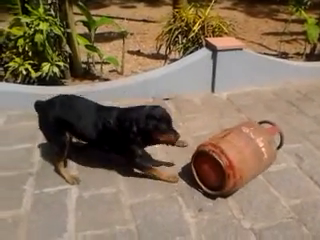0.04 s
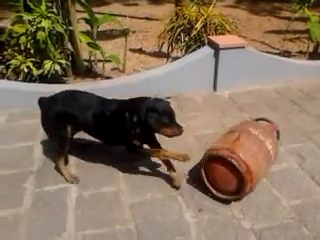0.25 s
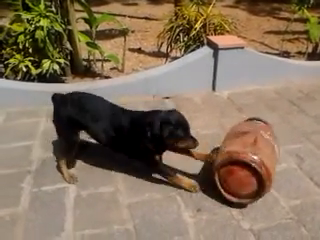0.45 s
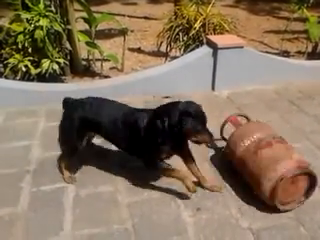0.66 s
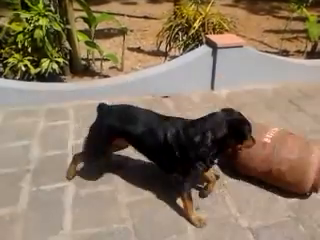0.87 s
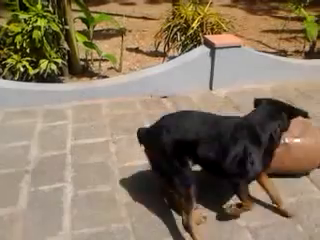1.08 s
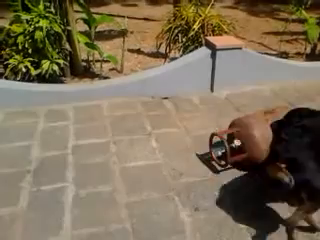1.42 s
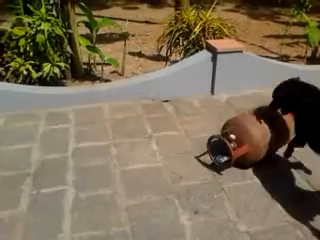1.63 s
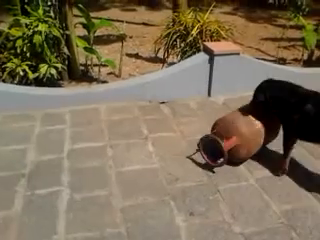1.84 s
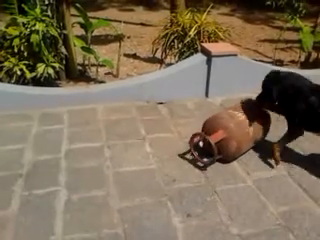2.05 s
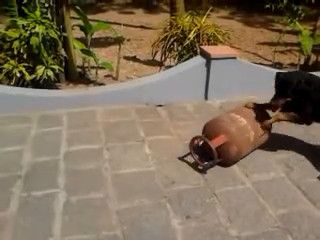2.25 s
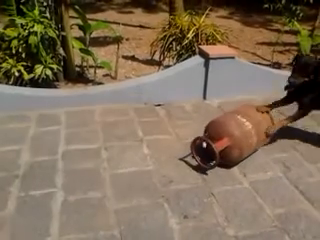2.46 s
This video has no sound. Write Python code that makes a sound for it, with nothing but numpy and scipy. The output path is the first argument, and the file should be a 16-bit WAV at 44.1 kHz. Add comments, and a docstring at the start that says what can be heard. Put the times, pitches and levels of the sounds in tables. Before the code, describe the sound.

A hollow metal gas cylinder is shoved across a paved yard. Two quick dog barks come first, with a metallic ring between them, then the cylinder clangs loudly, squeaks and grinds along, close to a dull-sounding microphone.

```python
"""Dog and rolling gas cylinder

A dog barks twice and shoves an empty steel gas cylinder over the stone paving of a walled yard.
The barks are rough glottal harmonics shaped by mouth and throat. The foot ring chimes; the shell
clanks in its modes, skids, squeaks, grinds on grit and bumps over the joints as it rolls.
A narrow-band microphone close by overloads on the loudest clank."""
import sys
import numpy as np
from scipy import signal
from scipy.fft import rfft, irfft
from scipy.io import wavfile
from scipy.ndimage import minimum_filter1d

SR = 44100
rng = np.random.default_rng(int(sys.argv[2]) if len(sys.argv) > 2 else 0)


def materialize(psi):
    """Save the field psi as 16-bit PCM at rate SR to the path in sys.argv[1].

    A 1-D psi becomes a single channel; in a 2-D psi each row is a channel.
    """
    bounded = np.clip(np.atleast_2d(psi).T, -1, 1)
    quanta = np.round(bounded * 32767).astype(np.int16)
    wavfile.write(sys.argv[1], SR, quanta)


N = 110250

# bark contours: (time [s], pitch [Hz], level [dB], mouth resonance [Hz])
BARK_1 = [(.178, 188, -48.5, 544), (.198, 235.7, -11.5, 700), (.218, 261.7, -9.5, 720),
          (.238, 305.5, -9.5, 650), (.251, 401, -12.5, 776), (.265, 527.6, -5.5, 1000),
          (.272, 536.5, -12, 1050), (.289, 510.8, -5.5, 975), (.297, 303.6, -21, 650),
          (.316, 285.4, -12, 582), (.345, 227, -31.5, 540)]
BARK_2 = [(.553, 154.5, -36, 379), (.58, 236.3, -21, 718), (.6, 320.1, -9, 878), (.617, 358, -7, 978),
          (.635, 268.7, -5.5, 645), (.655, 262.6, -6, 550), (.685, 211.8, -16, 660), (.71, 208.1, -16, 628),
          (.745, 175, -40.5, 570)]
# throat resonances: (centre [Hz], width [Hz], level [dB])
THROAT_1 = [(1040, 170, 0), (1870, 200, -7), (2170, 140, -12), (3380, 300, -25)]
THROAT_2 = [(1040, 220, -3), (1755, 140, 3), (2300, 200, -18), (3480, 300, -25)]
# steel modes: (frequency [Hz], level [dB], t60 [s])
SHELL_MODES = [(802.3, -2, 0.88), (821.4, -5.5, .45), (1118.5, 2, 0.31), (1440, -12.5, 0.34),
               (1640, -4.5, 0.3), (1772, -7.5, .4), (1825, 0, 0.22), (2138, -9.5, 0.76), (2253, 2.5, 0.25),
               (2440, -19.5, 0.32), (2758, -11.5, 0.49), (3033, -1, .32), (3150, -3.5, 0.26),
               (3197, -7, 0.43)]
FOOT_RING_MODES = [(1005, -14.5, 0.34), (2020, -8.5, 0.97), (2090, -0.5, 0.39), (2366, -4, 0.073),
                   (3306, 2.5, 0.067), (3314, -14, 0.5)]
# shell strikes: (time [s], boom [dB], ring [dB], clang [dB], ting [dB], clatter [dB])
SHELL_STRIKES = [(.003, -47, -32, -54.5, -46.5, -53.5), (.758, -49, -44.5, -34.5, -23.5, -51.5),
                 (.821, -25.5, -30.5, -40.5, -35.5, -48.5), (0.845, -21.5, -17.5, -33.5, -26, -28),
                 (.9, -7.5, -10, 0.5, -18, -3), (.925, -12, -7.5, -14.5, -31, -29.5),
                 (.945, -5, -11.5, -24.5, -30.5, -27), (1.068, -20, -21.5, -24.5, -43, -29.5),
                 (1.1745, -32, -24, -11.5, -12.5, -13.5), (1.274, -17.5, -24.5, -24, -39.5, -23.5),
                 (1.303, -11, -25.5, -33, -59.5, -31.5), (1.519, -24.5, -39.5, -38, -45, -35),
                 (1.575, -32.5, -32.5, -31.5, -51, -38.5), (1.598, -41.5, -45, -29, -38, -41),
                 (1.745, -25, -15, -37, -26, -24.5), (1.826, -41.5, -27, -43.5, -37.5, -30),
                 (2.124, -62.5, -30.5, -27, -22.5, -26.5), (2.345, -47, -38, -51, -33.5, -54)]
# shell registers: (boom [Hz], ring low [Hz], ring high [Hz], clang [Hz], ting [Hz])
REGISTERS_HZ = [800, 1120, 1830, 2250, 3100]
# foot ring knocks: (time [s], level [dB], tilt [dB/octave], clatter [dB])
FOOT_RING_KNOCKS = [(.335, -21, 12.5, -23.5), (.359, -16, 7, -26.5)]
# rim on stone: (time [s], rise [s], t60 [s], level [dB])
RIM_SKIDS = [(0.719, 0.033, 0.5, -18.5), (1.823, 0.034, 0.5, -18), (2.119, 0.0055, 0.15, -17)]
# sliding steel: (time [s], length [s], pitch [Hz], level [dB])
STEEL_SQUEAKS = [(0.972, 0.025, 1588, -15.5), (1.035, 0.087, 2074, -33.5), (1.245, 0.063, 2633, -20.5),
                 (1.585, 0.049, 2194, -26.5), (1.61, 0.018, 2960, -22.5), (1.85, 0.046, 3440, -20.5)]
# bumps over joints: (time [s], level [dB], pitch [Hz])
JOINT_BUMPS = [(.766, -10, 294), (.783, -24.5, 230), (.852, -18.5, 247.3), (0.902, -12.5, 200),
               (1.054, -23, 260), (1.12, -39, 240), (1.268, -21, 202), (1.539, -29.5, 187.5),
               (1.658, -27.5, 185), (1.741, -25.5, 200), (1.824, -31, 200), (2.324, -30.5, 260)]
# rolling contour: (time [s], grinding [dB], rumble [dB])
ROLL_LEVELS = [(0, -31, -45.5), (.16, -43.5, -53), (.22, -16, -31), (.38, -37, -48), (.53, -40, -49.5),
               (.7, -28.5, -29), (.87, -17.5, -37.5), (1.12, -20.5, -41.5), (1.4, -23, -40.5),
               (1.5, -27, -40), (1.58, -26, -30.5), (1.68, -32.5, -45), (1.87, -26.5, -53),
               (2.05, -31, -46), (2.2, -31.5, -52), (2.3, -34.5, -69), (2.42, -33.5, -60), (2.5, -41, -63)]
# noise spectra: (frequency [Hz], level [dB])
CLATTER_SPECTRUM = [(150, -19.5), (500, -0.5), (850, 9.5), (1300, 9), (1750, 6), (2300, 14), (3200, 10),
                    (3700, 7.5), (4500, -30.5)]
SKID_SPECTRUM = [(400, -44.5), (1500, -23), (2400, -0.5), (2900, 3.5), (3300, 12.5), (3600, 5),
                 (4500, -20.5)]
THUD_SPECTRUM = [(30, -23), (80, -4.5), (150, -1.5), (300, 2), (450, -4.5), (900, -16), (2000, -42)]
GRIT_SPECTRUM = [(200, -25), (500, -4), (850, 6.5), (1350, 3), (1800, 4.5), (2600, -3.5), (3200, -0.5),
                 (3700, -11), (4500, -17)]
RUMBLE_SPECTRUM = [(20, -23.5), (60, -9.5), (110, -0.5), (200, 0.5), (400, -1.5), (800, -6), (2000, -45)]

MOUTH_WIDTH_HZ, MOUTH_DB, CHEST_DB, VALLEY_DB = 200, 1.5, -26, -27
JITTER, SHIMMER_DB, RASP, RASP_KNEE_HZ = .024, 1.6, .33, 280
TWIN_MIN_SPLIT_HZ, TWIN_DB, WOBBLE_PER_S, WOBBLE_DB = 9, -9, 55, 3.2
STRIKE_RISE_S, CHIME_RISE_S, CRACK_DB = .004, .0048, 1
SQUEAK_WAVER, THUD_SAG_PER_S = .006, 6
GRIT_PER_S, GRIT_SPREAD_DB, GRIT_HISS, GRIT_DB = 600, 4.2, .09, -3.5
SING_DB, SING_DB_PER_OCTAVE = -8, -3.5
WALL_DELAY_S, YARD_DB = .02, -11.5
ROLLOFF_HZ, BAND_HZ, TOP_HZ = 3600, 4250, 16000
LIMIT_DB, LIMIT_LAG_S = -1.2, .014


def undb(db):
    """Decibels to gain."""
    return 10 ** (np.asarray(db) / 20)


def unit_rms(x):
    """Scale to rms 1."""
    return x / (np.sqrt(np.mean(x ** 2)) + 1e-12)


def since(start_s):
    """Seconds since start_s, zero before."""
    return np.maximum(np.arange(N) / SR - start_s, 0)


def envelope(age_s, rise_s, t60_s):
    """Linear attack, exponential decay."""
    return np.minimum(age_s / rise_s, 1) * undb(-60 * np.maximum(age_s - rise_s, 0) / t60_s)


def colour(x, spectrum):
    """Filter by a spectrum table; rms 1."""
    hz, db = np.array(spectrum, float).T
    bins_hz = np.maximum(np.fft.rfftfreq(N, 1 / SR), 1)
    gain = undb(np.interp(np.log(bins_hz), np.log(hz), db))
    return unit_rms(irfft(rfft(x) * gain, N))


def noise(spectrum):
    """Coloured noise; rms 1."""
    return colour(rng.standard_normal(N), spectrum)


def wander(rate_per_s, samples=N, knots=2000):
    """Random curve through Gaussian knots."""
    return np.interp(np.arange(samples) / SR * rate_per_s, np.arange(knots), rng.standard_normal(knots))


def bark(contour, throat):
    """Harmonics of uneven, rasping glottal pulses through a moving mouth and a steady throat."""
    times_s, pitch_hz, level_db, mouth_hz = np.array(contour, float).T
    span = np.arange(int(times_s[0] * SR), int(times_s[-1] * SR))
    t = span / SR
    hz = np.interp(t, times_s, pitch_hz)
    flutter = lambda rate_per_s: wander(rate_per_s, len(span), knots=400)
    phase = 2 * np.pi * np.cumsum(hz * (1 + JITTER * flutter(260))) / SR
    rasp = RASP * np.minimum(RASP_KNEE_HZ / hz, 1) ** 2
    mouth = (np.interp(t, times_s, mouth_hz), MOUTH_WIDTH_HZ, MOUTH_DB)
    chest = (hz, MOUTH_WIDTH_HZ, CHEST_DB)
    voice, power = 0, 0
    for k in range(1, 19):
        peaks = sum(undb(db) ** 2 / (1 + ((k * hz - centre_hz) / width_hz) ** 2 / 2) ** 4
                    for centre_hz, width_hz, db in [mouth, chest, *throat])
        harmonic_power = peaks + undb(VALLEY_DB) ** 2
        roughness = 1 + rasp * np.sqrt(min(k, 3) / 2) * (flutter(330) + 1j * flutter(330))
        harmonic = np.exp(1j * (k * phase + 2 * np.pi * rng.random()))
        voice += np.sqrt(harmonic_power) * np.real(roughness * harmonic)
        power += harmonic_power * (1 + rasp ** 2) / 2
    out = np.zeros(N)
    out[span] = voice / np.sqrt(power) * undb(np.interp(t, times_s, level_db) + SHIMMER_DB * flutter(260))
    return out


def struck_modes(modes, start_s, gains_db, rise_s):
    """Each mode beats with a weaker twin and wobbles as the cylinder turns."""
    first = int(start_s * SR)
    age_s = np.arange(min(N - first, int(.7 * SR))) / SR
    draws = rng.uniform(-1.1, 1, (len(modes), 2))
    out = np.zeros(N)
    for (hz, db, t60_s), gain_db, (offset, spread) in zip(modes, gains_db, draws):
        phase = 2 * np.pi * hz * age_s + np.pi * offset
        split_hz = TWIN_MIN_SPLIT_HZ * (spread + np.sign(spread))
        pair = np.sin(phase) + undb(TWIN_DB) * np.cos(phase + 2 * np.pi * split_hz * age_s)
        gain = undb(db + gain_db + WOBBLE_DB * wander(WOBBLE_PER_S, len(age_s), knots=100))
        out[first:first + len(age_s)] += gain * pair * envelope(age_s, rise_s, t60_s)
    return out


def clanks():
    """Shell on stone: a crack, a clatter of dense modes, and main modes weighted by strike point."""
    mode_hz = np.array(SHELL_MODES)[:, 0]
    out = np.zeros(N)
    for start_s, boom_db, ring_db, clang_db, ting_db, clatter_db in SHELL_STRIKES:
        gains_db = np.interp(mode_hz, REGISTERS_HZ, [boom_db, ring_db, ring_db, clang_db, ting_db])
        out += struck_modes(SHELL_MODES, start_s, gains_db, STRIKE_RISE_S)
        wash = envelope(since(start_s), STRIKE_RISE_S, t60_s=.41)
        crack = undb(CRACK_DB) * envelope(since(start_s), STRIKE_RISE_S, t60_s=.18)
        out += undb(clatter_db) * (wash + crack) / 2 * noise(CLATTER_SPECTRUM)
    return out


def chimes():
    """The foot ring is knocked as the cylinder swings round; the shell rattles with it."""
    mode_hz = np.array(FOOT_RING_MODES)[:, 0]
    octaves = np.log2(mode_hz / mode_hz[2])
    out = np.zeros(N)
    for start_s, db, db_per_octave, clatter_db in FOOT_RING_KNOCKS:
        out += struck_modes(FOOT_RING_MODES, start_s, db + db_per_octave * octaves, CHIME_RISE_S)
        wash = envelope(since(start_s), CHIME_RISE_S, t60_s=.58)
        out += undb(clatter_db) * wash * noise(CLATTER_SPECTRUM)
    return out


def grains():
    """Sand crushed under steel: dense, uneven clicks."""
    clicks = (rng.random(N) < GRIT_PER_S / SR) * rng.choice([-1, 1], N)
    return clicks * undb(GRIT_SPREAD_DB * np.minimum(rng.exponential(size=N), 4))


def skids():
    """The rim scrapes on stone in short, bright bursts."""
    out = np.zeros(N)
    for start_s, rise_s, t60_s, db in RIM_SKIDS:
        scrape = colour(grains() + .3 * rng.standard_normal(N), SKID_SPECTRUM)
        out += undb(db) * envelope(since(start_s), rise_s, t60_s) * scrape
    return out


def squeaks():
    """Sliding steel locks briefly onto one wavering tone."""
    out = np.zeros(N)
    for start_s, length_s, hz, db in STEEL_SQUEAKS:
        arch = np.sin(np.pi * np.minimum(since(start_s) / length_s, 1))
        tone = np.sin(2 * np.pi * np.cumsum(hz * (1 + SQUEAK_WAVER * wander(250))) / SR)
        out += undb(db + wander(120)) * arch * tone
    return out


def thuds():
    """The cylinder rocks over joints: a sagging low tone and a puff of rumble."""
    out = np.zeros(N)
    for start_s, db, hz in JOINT_BUMPS:
        age_s = since(start_s)
        sagging_hz = hz * np.exp(-THUD_SAG_PER_S * age_s) * (age_s > 0)
        tone = np.sin(2 * np.pi * np.cumsum(sagging_hz) / SR)
        bump = .68 * tone + .6 * noise(THUD_SPECTRUM)
        out += undb(db) * envelope(age_s, rise_s=.005, t60_s=.06) * bump
    return out


def rolling():
    """Grit crackles under the cylinder and keeps the shell singing over a low rumble."""
    t = np.arange(N) / SR
    times_s, grind_db, rumble_db = np.array(ROLL_LEVELS, float).T
    mode_hz = np.array(SHELL_MODES)[:, 0]
    grit = grains()
    shell = struck_modes(SHELL_MODES, 0, SING_DB_PER_OCTAVE * np.log2(mode_hz / mode_hz[0]), STRIKE_RISE_S)
    singing = unit_rms(irfft(rfft(grit) * rfft(shell), N))
    crackle = colour(grit + GRIT_HISS * rng.standard_normal(N), GRIT_SPECTRUM)
    grinding = undb(GRIT_DB) * crackle + undb(SING_DB + 1.6 * wander(40)) * singing
    grind_gain = undb(np.interp(t, times_s, grind_db) + 2 * wander(34.88))
    rumble_gain = undb(np.interp(t, times_s, rumble_db) + 2 * wander(25))
    return grind_gain * grinding + rumble_gain * noise(RUMBLE_SPECTRUM)


def yard(x):
    """Add a short diffuse echo from walls and plants."""
    tail = rng.standard_normal(N) * envelope(since(WALL_DELAY_S), rise_s=.0026, t60_s=.34)
    tail /= np.sqrt(np.sum(tail ** 2))
    return x + undb(YARD_DB) * signal.fftconvolve(x, tail)[:N]


def scene():
    """Dog and cylinder in the yard; mono."""
    dog = bark(BARK_1, THROAT_1) + bark(BARK_2, THROAT_2)
    cylinder = chimes() + clanks() + skids() + squeaks() + thuds() + rolling()
    return yard(dog + cylinder)[None]


def record(dry):
    """Narrow-band microphone with a lagging limiter; overshoots clip."""
    x = signal.sosfilt(signal.butter(7, ROLLOFF_HZ, fs=SR, output="sos"), dry[0])
    x = signal.sosfilt(signal.ellip(8, .2, 80, BAND_HZ, fs=SR, output="sos"), x)
    x = signal.sosfilt(signal.butter(2, 35, "high", fs=SR, output="sos"), x)
    target_gain = np.minimum(undb(LIMIT_DB) / (np.abs(x) + 1e-9), 1)
    held_gain = minimum_filter1d(target_gain, size=801, origin=200)
    pole = np.exp(-1 / (LIMIT_LAG_S * SR))
    reduction = signal.lfilter([1 - pole], [1, -pole], 1 - held_gain)
    clipped = np.clip(x * (1 - reduction), -1, 1)
    return signal.sosfilt(signal.ellip(8, .2, 70, TOP_HZ, fs=SR, output="sos"), clipped)[None]


dry = scene()
out = record(dry)
materialize(out)
```